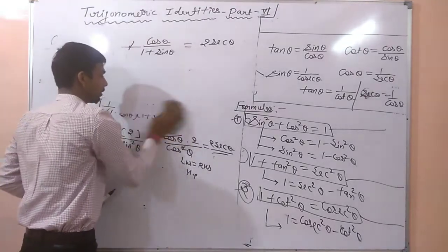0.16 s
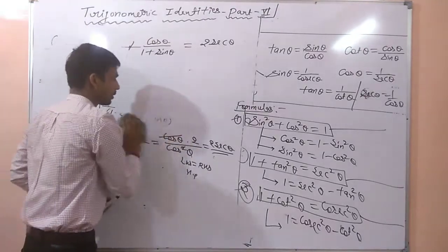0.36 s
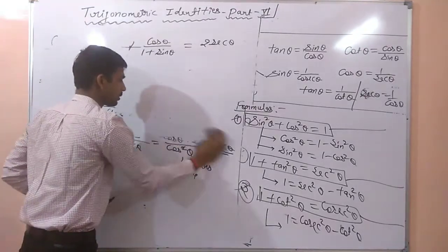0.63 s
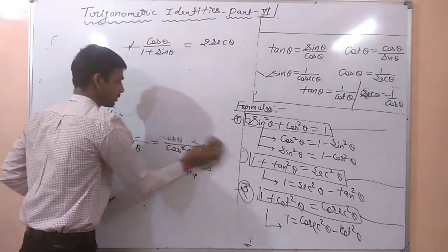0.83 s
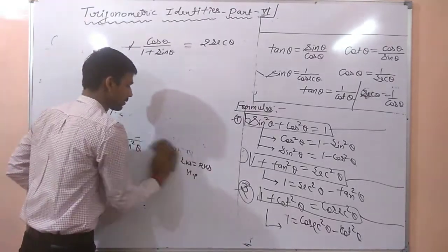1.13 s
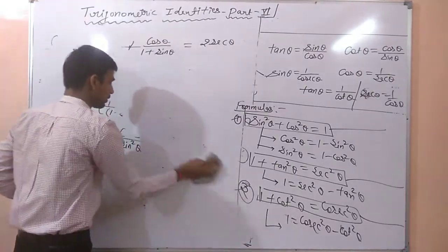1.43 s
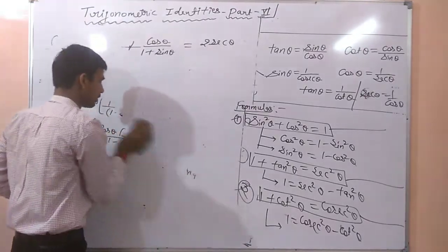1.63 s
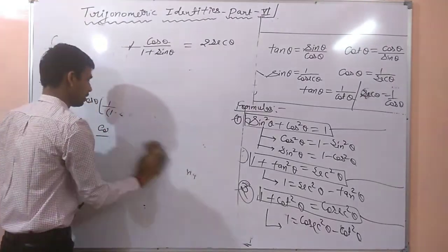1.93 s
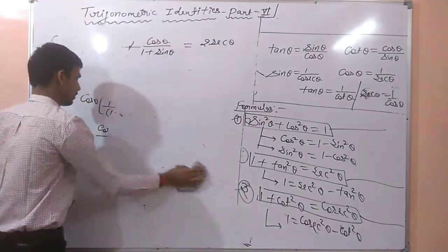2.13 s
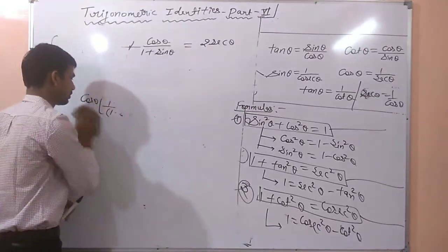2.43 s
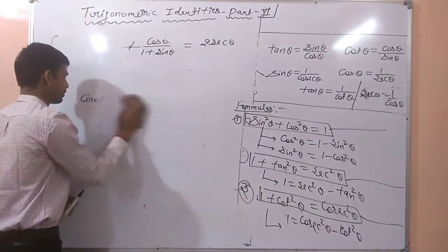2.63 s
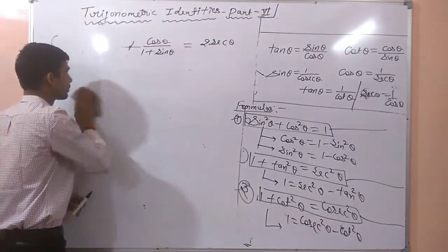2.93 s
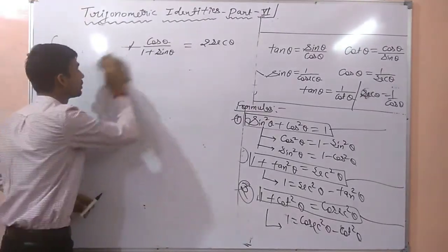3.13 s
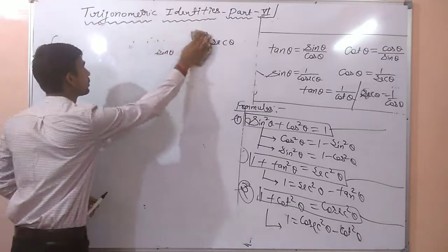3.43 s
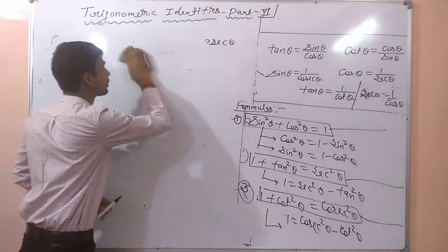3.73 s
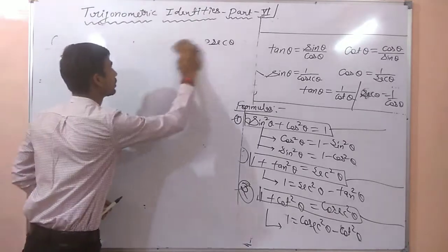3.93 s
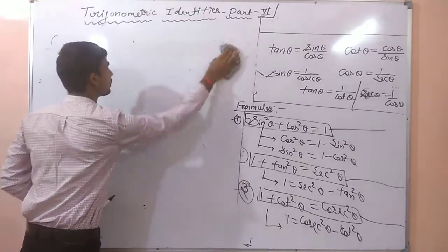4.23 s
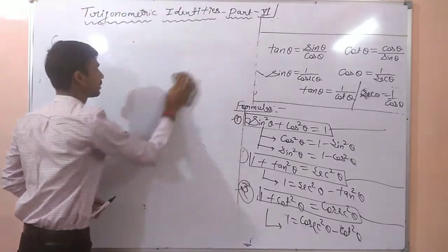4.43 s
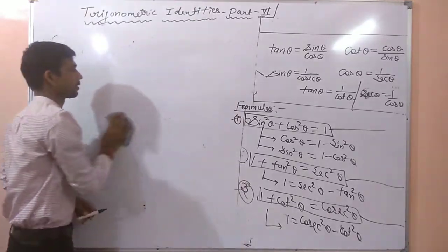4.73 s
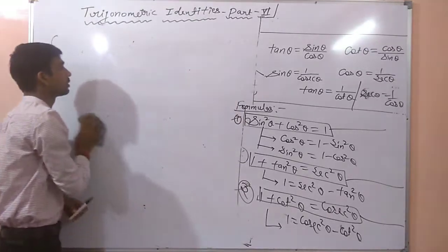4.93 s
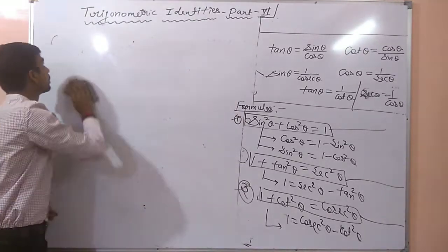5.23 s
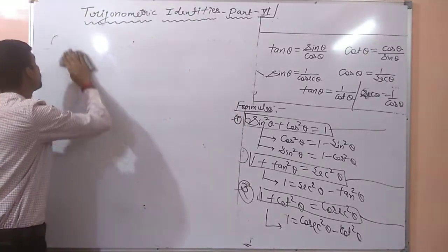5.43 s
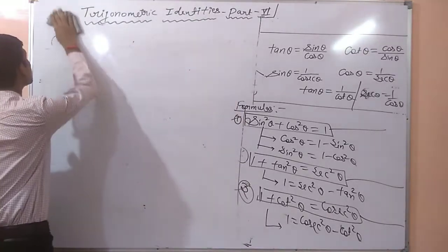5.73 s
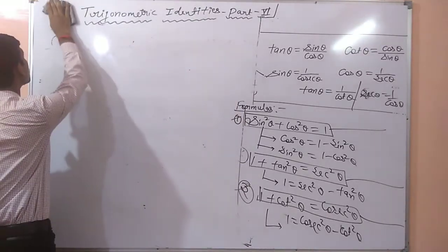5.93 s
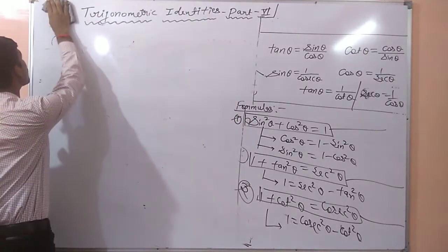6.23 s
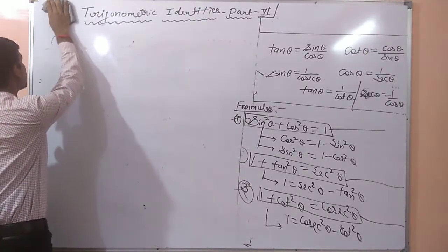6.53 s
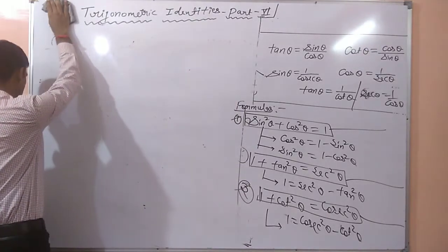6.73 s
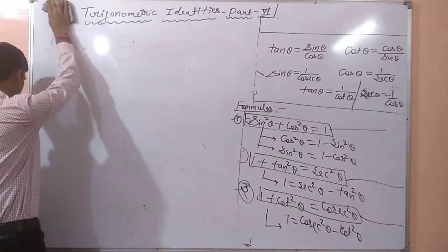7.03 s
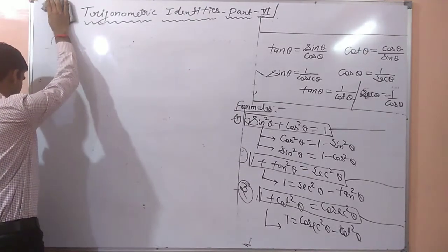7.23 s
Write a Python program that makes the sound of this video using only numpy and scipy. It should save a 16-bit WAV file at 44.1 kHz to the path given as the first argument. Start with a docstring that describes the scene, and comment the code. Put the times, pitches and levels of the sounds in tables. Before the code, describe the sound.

In a hard, reverberant classroom, someone wipes a whiteboard with a felt eraser. Soft swishes mix with gritty catches, snapping clicks and brief squeaky chirps, busiest in the first two seconds, over a faint low panel rumble. The board bumps dully, bounces on the wall midway and again, harder, later. After a short ringing scrape the wiping thins to light hisses and a last soft nudge, heard by a single static microphone.

```python
"""A bare, echoing classroom heard by one microphone; distance is fixed, so the tables alone set levels.
From the start, felt hisses over a whiteboard in strokes, sticking and slipping in ticks, creaks and squeaks,
with thumps where strokes turn. Near 3 s a hard push rattles the board on the wall with a long boom, and near
5.5 s another does, just after a soft nudge. From 5.75 s the slips ring the stiff top corner, then light wipes
and a last nudge end it. Filtered noise makes felt and air, resonances the slips, decaying modes the board."""
import sys
import numpy as np
from scipy import signal
from scipy.fft import rfft, irfft, next_fast_len
from scipy.io import wavfile

SR = 44100
rng = np.random.default_rng(int(sys.argv[2]) if len(sys.argv) > 2 else 0)


def materialize(psi):
    """Save the field psi as 16-bit PCM at rate SR to the path in sys.argv[1].

    A 1-D psi becomes a single channel; in a 2-D psi each row is a channel.
    """
    bounded = np.clip(np.atleast_2d(psi).T, -1, 1)
    quanta = np.round(bounded * 32767).astype(np.int16)
    wavfile.write(sys.argv[1], SR, quanta)


N = 325017
TIME = np.arange(N) / SR
STEPS = TIME[::100]  # coarse times for the stroke envelopes
EDGE_HZ = 15650  # upper edge of the recorder's band

# wiping strokes, levels before each layer's trim:
# (time [s], length [s], rub [dB], fine hiss [dB], grit [dB])
STROKES = [(0, 0.04, -46.5, -68, -44.5), (0.405, 0.46, -53, -52, -50), (1.111, 0.084, -56, -47.5, -45.5),
           (1.423, 0.36, -54.5, -54.5, -73), (1.758, 0.13, -61, -58, -47.5), (2.102, 0.72, -49.5, -56, -53),
           (3.03, 0.58, -54.5, -55, -52), (3.752, 0.37, -51.5, -54, -47.5), (4.26, 0.27, -60, -59, -48.5),
           (4.958, 0.25, -54, -56.5, -57), (5.4, 0.6, -54, -64, -56), (6.058, 0.051, -41, -48, -62),
           (6.425, 0.7, -75.5, -60, -82), (6.936, .2, -63, -55, -72), (7.242, 0.041, -53.5, -60.5, -58)]
ATTACK_S, RELEASE_S, HISS_RELEASE_S = 0.01, 0.2, 0.17  # the hand speeds up, and the stroke dies away
# colour of the sliding felt: (frequency [Hz], density [dB per Hz])
FELT_COLOUR = [(150, -1), (500, 9.5), (1100, 3), (1600, 7.5), (1900, 7.5), (2300, 8.5), (2900, 2),
               (3600, 4), (4800, -8.5), (6500, -9), (9000, -5.5), (15000, -55)]
# colour of the fine hiss: (frequency [Hz], density [dB per Hz])
HISS_COLOUR = [(3000, 5), (6000, 6.5), (8000, 6), (9700, 7.5), (11200, 6.5), (12700, 5), (15500, 8.5)]
# the felt skims lightly on a fast return: (middle time [s], level [dB], centre [Hz])
SKIMS = [(2.4, -56, 9700), (2.92, -55, 11200), (5.32, -55.5, 10800), (5.702, -52.5, 6600)]
SKIM_S, SKIM_SKIRT_DB = 0.065, 16  # spread of the swell, and the fall an octave from the centre

# the loudest single slips, level before the trim in ticks():
# (time [s], level [dB], brightness [dB per octave])
TICKS = [(0.2667, -27, 2), (0.41, -27, 1.5), (1.1416, -21, 8), (1.197, -25, 8), (1.367, -34, 1),
         (1.836, -20.5, 3.5), (1.8783, -23.5, 3), (1.95, -18, 4), (1.982, -17.5, 3.5), (2.2134, -31, 11),
         (2.262, -28, 1.5), (2.546, -29, 4), (3.453, -29, 0.5), (3.514, -34, -6), (3.856, -35, 2),
         (4.128, -33.5, -10), (4.156, -34.5, -7), (4.202, -32, -4), (4.47, -44, 7), (4.5522, -35, -2),
         (4.571, -31, -2), (4.61, -34, 7), (4.622, -30, 3), (4.6996, -26.5, 0), (5.4288, -33.5, 4),
         (5.9953, -28.5, 0), (6.027, -23.5, -0.5), (6.0352, -26, -2), (6.0693, -22, 0.5),
         (7.0958, -31.5, 2)]
# faint slips while the felt slides: chances per second, level and spread against the grit of STROKES
STRAYS_PER_S, STRAY_DB, STRAY_SPREAD_DB = 2.7, 7, 2
# runs of stick and slip: (time [s], length [s], slip rate [per s], level [dB], brightness [dB per octave])
CREAKS = [(0.041, 0.05, 460, -45.5, -6), (0.121, 0.021, 910, -36, 2), (0.384, 0.0128, 530, -42.5, 0),
          (0.437, 0.039, 410, -38.5, 5.5), (.676, 0.025, 270, -41, -1.5), (0.749, 0.04, 660, -40, 0),
          (1.086, 0.014, 750, -36.5, 4), (1.147, 0.019, 293, -36, 1.5), (1.409, 0.017, 1120, -37.5, 6),
          (1.462, 0.015, 286, -43.5, 2), (1.784, 0.024, 780, -45, 0), (1.797, 0.014, 360, -40.5, 2.5),
          (1.841, 0.034, 380, -35, 3), (2.148, 0.019, 920, -38, 3.5), (2.7, .025, 760, -39.5, 1),
          (3.763, 0.047, 770, -44.5, 4.5), (4.232, 0.018, 1100, -43, 5), (4.517, 0.016, 1100, -47, 1),
          (4.585, 0.021, 940, -45, 0), (5.687, 0.018, 250, -42, 10), (5.853, 0.058, 305, -39.5, 2.5),
          (6.075, 0.056, 530, -38, 0)]
CREAK_GLIDE, CREAK_GROWTH_DB = 0.62, 1  # slip rate at the end over that at the start; gain added over a run
# on the face a tighter grip slips faster and rings higher: slip rate at unshifted ring, exponent
GRIP_HZ, GRIP_STIFFENS = 556, 0.11
# squeaks: (time [s], length [s], first pitch [Hz], last pitch [Hz], level [dB])
SQUEAKS = [(1.08, 0.013, 3850, 3550, -40), (1.408, .014, 4940, 5190, -39), (3.905, 0.01, 3880, 3590, -39),
           (4.235, 0.013, 5120, 5300, -43), (6.099, 0.03, 5750, 5060, -42.5)]
SQUEAK_ROUGH = 0.03  # pitch jitter as a fraction

# ring of the duster flat on the board, at unit stiffness: (frequency [Hz], width [Hz], gain [dB])
FACE_RING = [(1647, 210, -0.5), (2480, 1150, 1.5), (3574, 600, 7.5), (4360, 2250, 4.5), (5500, 880, 0.5),
             (6590, 340, -2), (7330, 5100, -4), (9770, 840, -3.5), (12450, 4400, -9), (13200, 2400, -5.5),
             (14600, 1000, -14)]
# its ring on the board's stiff top corner: (frequency [Hz], width [Hz], gain [dB])
CORNER_RING = [(3229, 190, 4.5), (5030, 513, 2.5), (5430, 945, 8.5), (7970, 1100, -5), (9700, 1500, -3),
               (12400, 1800, -9), (14300, 2100, -4.5)]
CORNER_S = 5.75  # ticks and creaks after this time are at the corner
# colour of the board's skin singing on after each slip: (frequency [Hz], density [dB per Hz])
SKIN_COLOUR = [(1450, 8.5), (1900, 6), (2650, 6), (3720, 4), (4200, -3), (6500, 2.5), (11000, 6.5),
               (12500, 10), (15500, -2)]

# the duster lands or turns: (time [s], level [dB], hardness as upper edge [Hz])
THUMPS = [(.254, -34, 910), (.535, -32.5, 510), (1.178, -42, 490), (1.963, -32.5, 1540),
          (2.65, -34.5, 1260), (3.007, -37, 1135), (3.968, -33.5, 927), (4.371, -35, 940),
          (4.72, -39.5, 895)]
# colour of the panel giving way: (frequency [Hz], density [dB per Hz])
PUSH_COLOUR = [(10, 1.5), (25, -1), (60, 2.5), (100, -1.5), (140, -6), (500, -53), (4000, -110)]
PUSH_DB, PUSH_FALL_DB = 3.5, 2  # push against a thump of 900 Hz hardness, and its loss per octave harder
# colour of the duster's hard back: (frequency [Hz], density [dB per Hz])
CLACK_COLOUR = [(200, -8), (600, 5.0), (1650, -1), (3500, 4.5), (7000, -28), (15000, -45)]
# the hand nudges the panel: (time [s], peak level [dB])
NUDGES = [(5.429, -30.5), (7.096, -34.5)]
# the board knocks on the wall: (time [s], level [dB], hardness as upper edge [Hz])
KNOCKS = [(3.045, -29.5, 644), (3.084, -27, 730), (3.116, -32.5, 724), (3.154, -32.5, 516),
          (5.495, -19.5, 1060), (5.515, -30, 1070), (5.533, -23, 980), (5.589, -27, 800)]
CONTACT_DB, CONTACT_HZ, CONTACT_S = 8.5, 312, 0.0025  # each knock opens with one hard swing of the panel
# modes of the board, relative: (frequency [Hz], t60 [s], bumped on the face [dB], knocking on the wall [dB])
BOARD_MODES = [(44.1, 0.93, -11, 5), (66.2, 1.7, -8.5, 3), (155.85, 1.5, -11, -8), (192.6, 0.83, 4.5, -8),
               (210.6, 1.65, -34, 0.5), (223, 1.24, -4, 7), (276.6, 1.23, -0.5, -13), (313.6, 0.8, -22, 6),
               (327, 1.08, 0, -13), (357.4, 1.1, -3.5, -10), (371.5, 1.26, -23, 0), (490, 1.14, -3.5, -15),
               (676, 1.25, -10.5, -20), (697, 0.84, -35, -7), (853, 1.3, -14, -25), (1020, 1.4, -30, -11)]
# colour of the board's dense wash: (frequency [Hz], density [dB per Hz])
PANEL_COLOUR = [(25, -25), (85, -8), (165, -4.5), (300, -1.5), (420, -6.5), (560, -13), (800, -13),
                (1150, -17), (1600, -9), (3000, -33), (8000, -15.5), (15000, -42)]

# decay of the classroom: (frequency [Hz], t60 [s])
ROOM_DECAY = [(50, 2.82), (300, 1.595), (1100, 1.61), (3500, 0.76), (7000, 0.64), (14000, 0.29)]
# the panel sways under the hand, before the trim in sway(): (time [s], level [dB])
SWAY = [(0.0, -38), (0.57, -45), (0.82, -50), (1.29, -50.5), (1.7, -57), (2.13, -41.5), (2.44, -50.5),
        (3.26, -39.5), (3.37, -46), (3.8, -49.5), (4.27, -44), (5.11, -44), (5.65, -44), (5.95, -52.5),
        (6.98, -60), (7.37, -52)]
# colour of the swaying rumble: (frequency [Hz], density [dB per Hz])
SWAY_COLOUR = [(10, 6.5), (30, 2), (65, 2), (85, -10), (130, -14.5), (230, -13.5), (380, -20), (600, -23.5),
               (1200, -31.5), (4000, -41.5)]
# colour of the room's air: (frequency [Hz], density [dB per Hz])
AIR_COLOUR = [(50, 6), (120, -5), (280, 4.5), (550, -15.5), (1600, -8.5), (6000, -53), (16000, -18)]


def rubbing(rub_db=-4, hiss_db=-1, grit_db=-4.5, clump_db=3.5):
    """Felt slides with a steady hiss, and grit comes in clumps where it drags."""
    flutter = amp(0.7 * wander(45, N))
    rub = amp(rub_db) * effort("rub", RELEASE_S) * noise(FELT_COLOUR, N)
    hiss = amp(hiss_db) * effort("hiss", HISS_RELEASE_S) * noise(HISS_COLOUR, N)
    clumps = amp(grit_db + clump_db * wander(30, N))
    catching = clumps * effort("grit", RELEASE_S) * grit()
    return flutter * (rub + hiss) + classroom(catching)


def effort(column, release_s):
    """Gain of one layer over time: every stroke is an attack, a hold and a release."""
    strokes = np.array(STROKES)
    t = np.maximum(STEPS[:, None] - strokes[:, 0], 0)
    attack = 1 - np.exp(-t / ATTACK_S)
    release = np.exp(-np.maximum(t - strokes[:, 1], 0) / release_s)
    level = amp(strokes[:, {"rub": 2, "hiss": 3, "grit": 4}[column]])
    loudest = (level * attack * release).max(1)
    return np.interp(TIME, STEPS, loudest)


def grit(catches_per_s=260, bright_db=-3, skin_db=-7):
    """Tufts of felt catch at random, ringing the duster and the board's skin near 3.7 kHz."""
    strength = amp(5 * np.minimum(rng.exponential(1, N), 2.5))
    catches = (rng.random(N) < catches_per_s / SR) * strength
    duster = unit(slip(0, catches, bright_db, stiffness=0.93, scatter=0.8)[:N])
    skin = unit(signal.oaconvolve(catches, wavelet(3650, 690))[:N])
    return unit(duster + amp(skin_db) * skin)


def skims():
    """Barely touching, the felt gives a thin swish that swells and fades."""
    out = np.zeros(N)
    for s, db, hz in SKIMS:
        swell = np.exp(-((TIME - s) / SKIM_S) ** 2 / 2)
        colour = [(hz / 10, -10 * SKIM_SKIRT_DB), (hz / 2, -SKIM_SKIRT_DB), (hz, 0), (hz * 2, -SKIM_SKIRT_DB)]
        out += amp(db) * swell * noise(colour, N)
    return out


def slip(s, force, bright_db, stiffness=1, spread_s=0.0031, scatter=0.1):
    """Each slip is a snap, then a short scatter of fibres letting go; both ring the duster."""
    snaps = np.pad(force, (0, SR // 100))
    letting_go = signal.lfilter([1], [1, -np.exp(-1 / (spread_s * SR))], snaps)
    fibres = letting_go * rng.standard_normal(len(snaps))
    ring = CORNER_RING if s > CORNER_S else FACE_RING
    # brightness tips the resonances about 6 kHz
    body = sum(amp(db + bright_db * np.log2(hz / 6000)) * wavelet(hz * stiffness, width)
               for hz, width, db in ring)
    return signal.fftconvolve(snaps + scatter * fibres, body)


def tick(s, db, bright_db, length_s=0.0025):
    """A lone slip, where the felt catches once; its energy is that of length_s at the given level."""
    sound = slip(s, np.ones(1), bright_db, spread_s=0.0022, scatter=0.22)
    return amp(db) * sound * np.sqrt(length_s * SR / np.sum(sound ** 2))


def ticks(gain_db=-7, stray_bright_db=2):
    """The loud slips, and faint ones at random wherever the felt slides on the board's face."""
    out, grip = np.zeros(N), effort("grit", RELEASE_S)
    for s, db, bright_db in TICKS:
        add(out, s, tick(s, db + gain_db, bright_db))
    for place, size in rng.random((int(STRAYS_PER_S * CORNER_S), 2)):
        s = place * CORNER_S
        db = STRAY_DB + STRAY_SPREAD_DB * (2 * size - 1)
        add(out, s, grip[int(s * SR)] * tick(s, db, stray_bright_db))
    return out


def creaks(uneven_db=0.5):
    """The felt sticks and slips hundreds of times a second, unevenly, slowing as the grip lets go."""
    out = np.zeros(N)
    for s, length, rate, db, bright_db in CREAKS:
        u = np.linspace(0, 1, max(int(length * SR), 64))
        slips_per_s = rate * CREAK_GLIDE ** (u - 0.5) * np.exp(0.12 * wander(500, len(u)))
        turns = np.cumsum(slips_per_s) / SR
        snaps = np.diff(np.floor(turns), prepend=-1)  # one snap per whole turn
        # the grip tightens and lets go over the run
        grip = amp(uneven_db * wander(420, len(u)) + CREAK_GROWTH_DB * u) * (0.5 + np.sin(np.pi * u ** 0.5))
        stiffness = 1 if s > CORNER_S else (rate / GRIP_HZ) ** GRIP_STIFFENS
        sound = slip(s, snaps * grip, bright_db, stiffness, spread_s=0.0009, scatter=0.13)
        sound = disperse(sound, width_hz=700, count=12)
        add(out, s, amp(db) * sound * np.sqrt(len(u) / np.sum(sound ** 2)))
    return out


def disperse(x, width_hz, count):
    """The duster's body delays some pitches more than others, smearing each snap over a few milliseconds."""
    r = np.exp(-np.pi * width_hz / SR)
    hz = EDGE_HZ * rng.random(count) ** 1.5
    turn = -2 * r * np.cos(2 * np.pi * hz / SR)
    return signal.sosfilt([[r * r, c, 1, 1, c, r * r] for c in turn], x)  # all-pass sections


def squeaks(uneven_db=2):
    """The slips lock onto one ring of the duster: a hoarse, gliding squeak."""
    out = np.zeros(N)
    for s, length, first_hz, last_hz, db in SQUEAKS:
        u = np.linspace(0, 1, int(length * SR))
        hz = first_hz * (last_hz / first_hz) ** u * np.exp(SQUEAK_ROUGH * wander(1500, len(u)))
        phase = 2 * np.pi * np.cumsum(hz) / SR
        grip = np.sin(np.pi * u) ** 0.5 * amp(uneven_db * wander(GRIP_HZ, len(u)))
        add(out, s, amp(db) * unit(grip * np.sin(phase)))
    return out


def thumps(push_s=0.084, rise_s=0.0057):
    """The duster bumps the board, and the panel gives way with a low push, strongest under a soft blow."""
    out, t = np.zeros(N), np.arange(SR // 2) / SR
    for s, db, edge_hz in THUMPS:
        answer = board("face", modes_db=3.5, early_db=16.5, early_s=0.024)
        add(out, s, strike(answer, db, edge_hz, order=2))
        add(out, s, amp(db) * soften(clack(), edge_hz * 4, order=1))
        push = noise(PUSH_COLOUR, len(t)) * np.exp(-t / push_s) * (1 - np.exp(-t / rise_s))
        push_db = db + PUSH_DB - PUSH_FALL_DB * np.log2(edge_hz / 900)
        add(out, s, amp(push_db) * push / np.std(push[:SR // 20]))
    return out


def clack(clack_db=-2, ring_s=0.0081):
    """The duster's hard back knocks briefly as it lands."""
    t = np.arange(SR // 10) / SR
    return amp(clack_db) * noise(CLACK_COLOUR, len(t)) * np.exp(-t / ring_s)


def knocks():
    """The board bounces on the wall behind it: a hard swing, then the boom."""
    out, answer = np.zeros(N), board("wall", modes_db=-9.0, early_db=-4, early_s=0.017)
    t = np.arange(SR // 20) / SR
    swing = amp(CONTACT_DB) * np.sin(2 * np.pi * CONTACT_HZ * t) * np.exp(-(t / CONTACT_S) ** 2)
    for s, db, edge_hz in KNOCKS:
        add(out, s, strike(answer, db, edge_hz, order=5))
        add(out, s, amp(db) * soften(swing, edge_hz, order=4))
    return out


def board(place, modes_db, early_db, early_s):
    """The board answers a blow with clear modes over a dense wash that lingers in the room."""
    t = np.arange(2 * SR) / SR
    wash = die_away(noise(PANEL_COLOUR, len(t))) * (1 + amp(early_db) * np.exp(-t / early_s))
    modes = np.zeros(len(t))
    for k, (hz, t60, face_db, wall_db) in enumerate(BOARD_MODES):
        db = face_db if place == "face" else wall_db
        sign = (-1) ** (k // 2)
        modes += sign * amp(db - 60 * t / t60) * np.sin(2 * np.pi * hz * t)
    return wash + amp(modes_db) * modes


def strike(answer, db, edge_hz, order):
    """One blow of a given hardness, its level taken over the first 40 ms."""
    sound = soften(answer, edge_hz, order=order)
    return amp(db) * sound / np.std(sound[:SR // 25])


def soften(x, edge_hz, order):
    """A soft contact leaves out the high modes."""
    return signal.sosfilt(signal.butter(order, min(edge_hz, SR / 3), fs=SR, output="sos"), x)


def nudges(width_s=0.0022):
    """A soft, dead bump: the panel gives once and comes back without ringing."""
    out = np.zeros(N)
    for s, db in NUDGES:
        u = (TIME - s) / width_s
        out += amp(db) * (1 - u ** 2) * np.exp(-abs(u))
    return out


def sway(gain_db=6):
    """The loose panel rumbles under the moving hand."""
    return amp(np.interp(TIME, *np.transpose(SWAY)) + gain_db) * noise(SWAY_COLOUR, N)


def classroom(x, wet_db=-5.0, delay_s=0.0013, build_s=0.023):
    """The board's skin and the hard walls keep each slip ringing as a dense tail."""
    t = np.arange(SR) / SR
    build_up = 1 - np.exp(-np.maximum(t - delay_s, 0) / build_s)
    tail = die_away(noise(SKIN_COLOUR, len(t))) * build_up
    return x + amp(wet_db) * signal.fftconvolve(x, tail / np.linalg.norm(tail))[:N]


def die_away(x):
    """Each band fades at the rate of the room."""
    hz, t, z = signal.stft(x, SR, nperseg=512)
    fade = amp(-60 * t / read(ROOM_DECAY, hz)[:, None])
    return signal.istft(z * fade, SR, nperseg=512)[1][:len(x)]


def room_air():
    """The quiet air of the classroom: steady coloured noise."""
    return amp(-59.5) * noise(AIR_COLOUR, N)


def wavelet(hz, width):
    """A resonance that swells and dies within milliseconds, of equal peak gain at any width."""
    t = np.arange(700) / SR
    return width ** 2 * t * np.exp(-np.pi * width * t) * np.cos(2 * np.pi * (hz * t + rng.random()))


def noise(colour, size):
    """Noise of a given colour, rms 1."""
    n = next_fast_len(size)
    gain = amp(read(colour, np.fft.rfftfreq(n, 1 / SR)))
    return unit(irfft(rfft(rng.standard_normal(n)) * gain, n)[:size])


def wander(per_s, size):
    """Slow chance, straight lines between random knots, rms about 1."""
    knots = rng.standard_normal(4000)
    return np.interp(np.arange(size) / SR * per_s, np.arange(len(knots)), knots) * np.sqrt(3 / 2)


def read(points, hz):
    """Reads a table on a log-frequency axis."""
    f, value = np.transpose(points)
    return np.interp(np.log(hz + 1), np.log(f + 1), value)


def amp(db):
    """Decibels to gain."""
    return 10 ** (np.asarray(db) / 20)


def unit(x):
    """Scales to rms 1."""
    return x / np.sqrt(np.mean(x ** 2) + 1e-20)


def add(mix, s, sound):
    """Mixes a sound in at time s."""
    part = mix[max(round(s * SR), 0):][:len(sound)]
    part += sound[:len(part)]


def scene():
    """Duster, board and the quiet air of the room, in one channel."""
    slips = classroom(ticks() + creaks() + squeaks())
    felt = rubbing() + skims()
    panel = thumps() + knocks() + nudges() + sway()
    return (felt + slips + panel + room_air())[None]


def record(dry):
    """The recorder's band limit."""
    low_pass = signal.firwin(511, EDGE_HZ, window=("kaiser", 9), fs=SR)
    return signal.oaconvolve(dry, low_pass[None], "same")


dry = scene()
out = record(dry)
materialize(out)
```